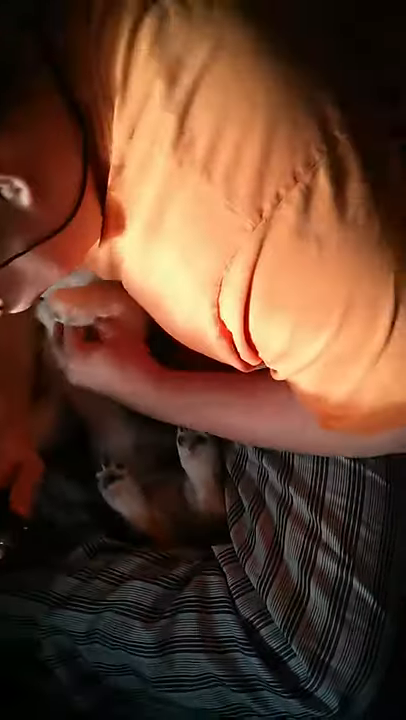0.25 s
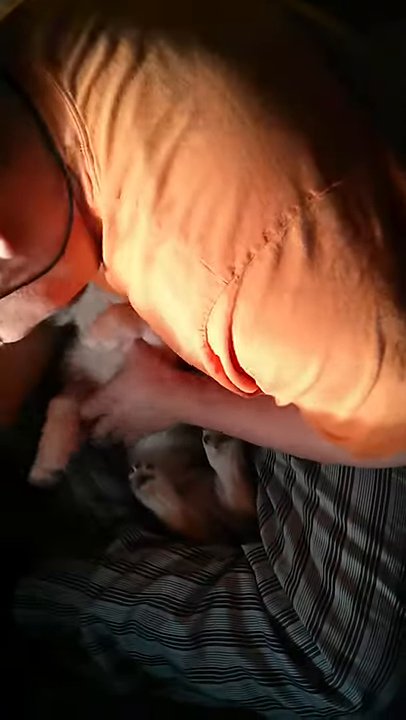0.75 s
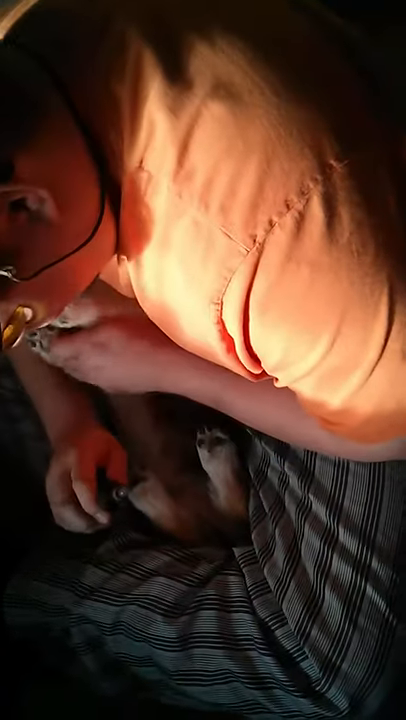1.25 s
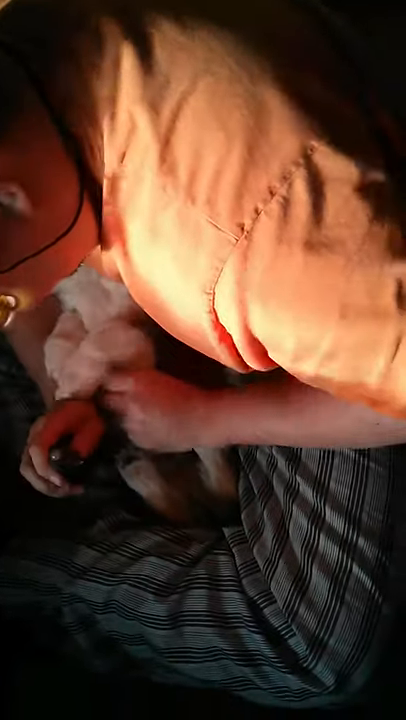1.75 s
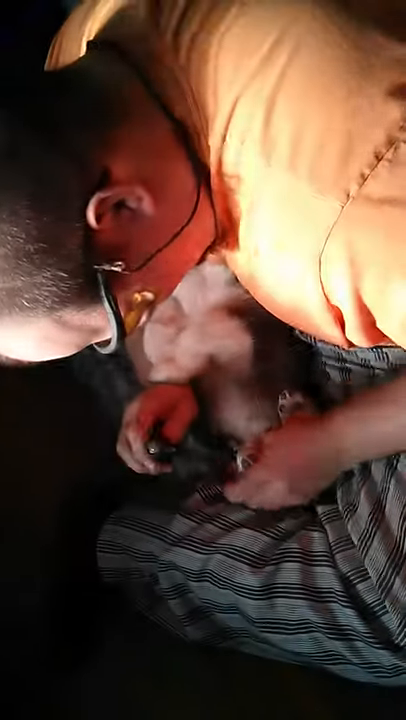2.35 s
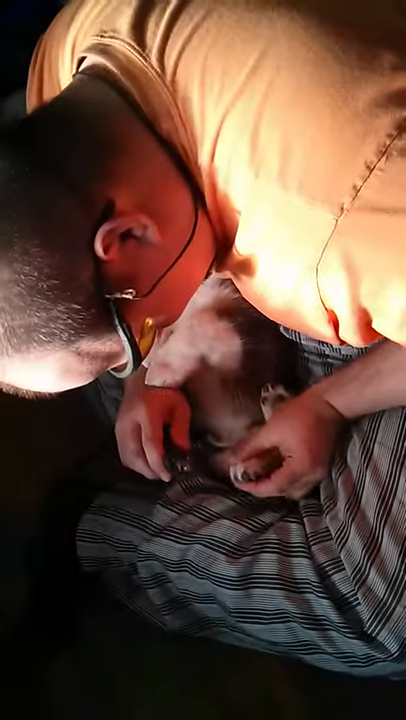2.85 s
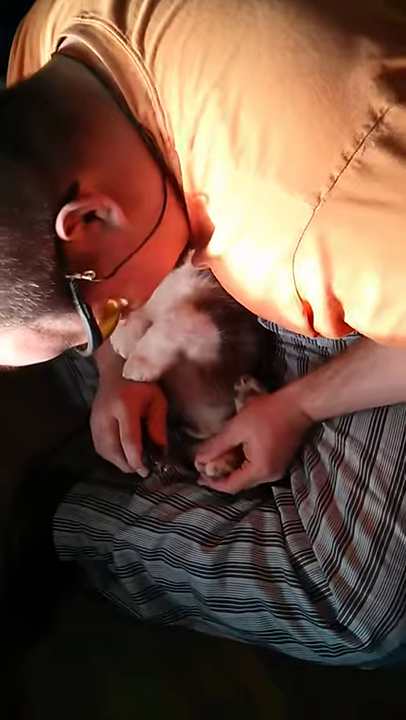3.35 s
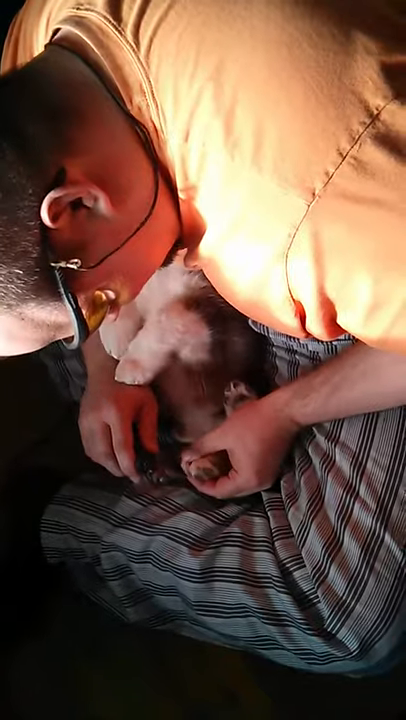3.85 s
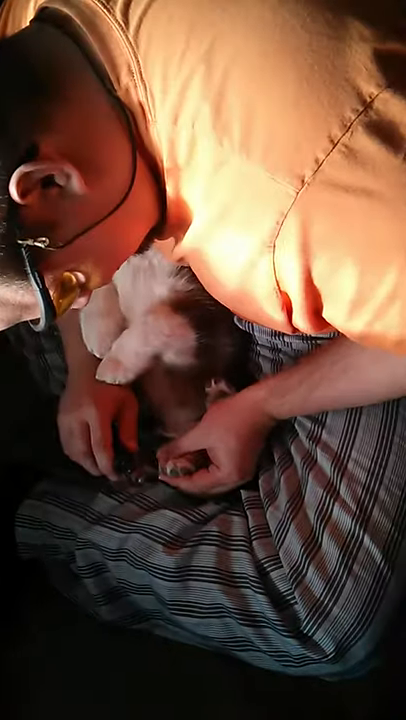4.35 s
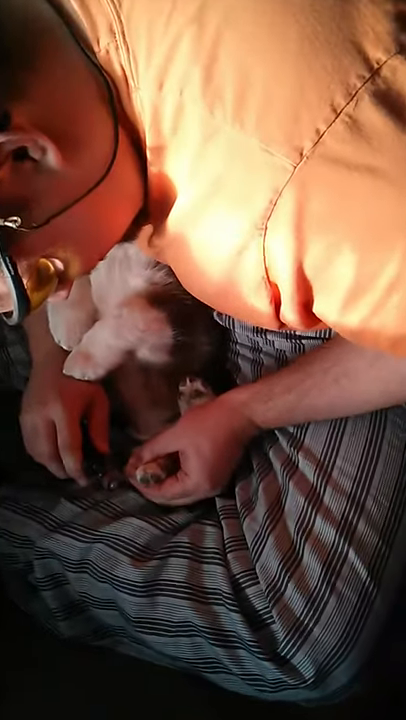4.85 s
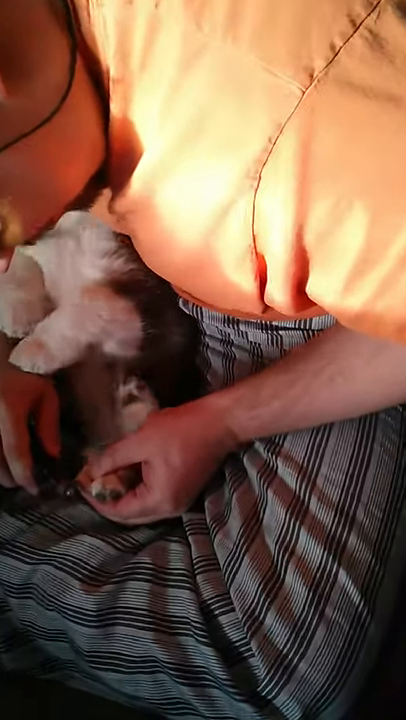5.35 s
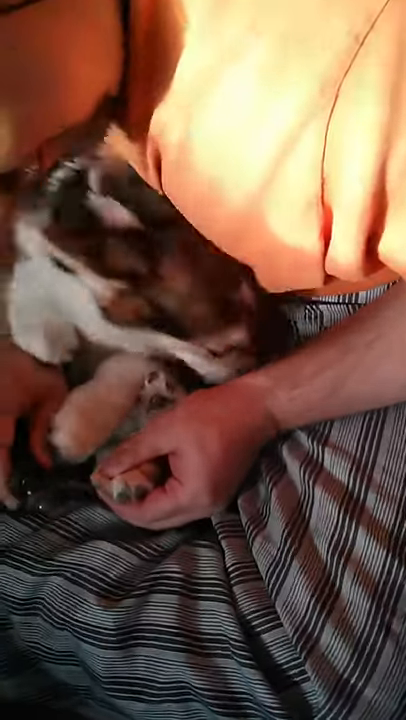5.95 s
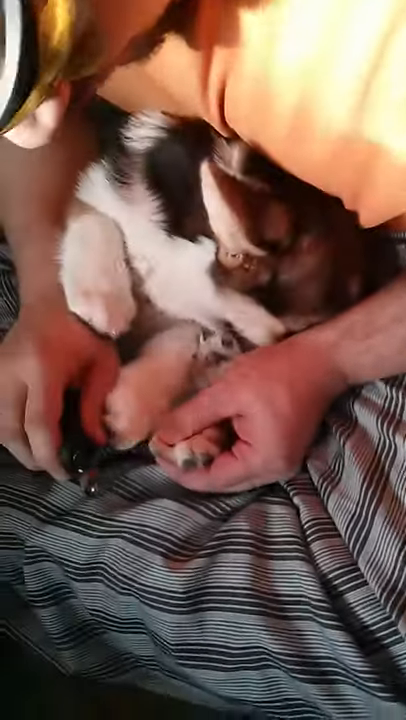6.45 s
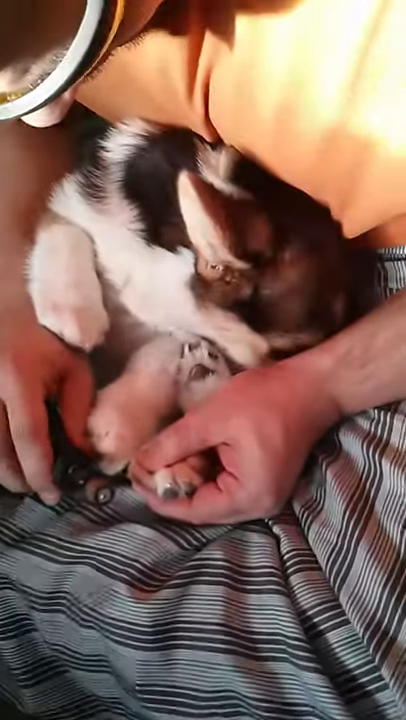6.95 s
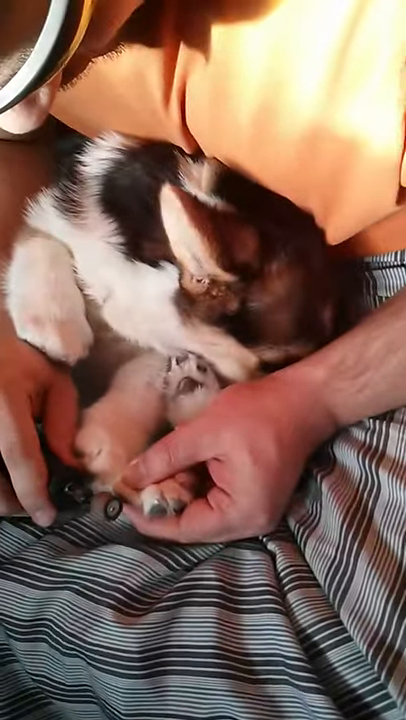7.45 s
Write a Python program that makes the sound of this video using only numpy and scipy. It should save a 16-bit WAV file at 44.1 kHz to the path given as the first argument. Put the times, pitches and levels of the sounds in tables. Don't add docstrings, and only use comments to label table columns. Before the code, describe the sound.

Close, mono phone sound of a tiny high-speed motor already running and never stopping. Its fan sings a needle-thin, very high tone amid sharp hiss; lower hums swell and fade underneath. The tone darts in and out at first, steadies, dips briefly around five seconds, then returns stronger with more rattle, hum and dull air buffeting, cut off while still running.

```python
import sys
import numpy as np
from scipy import signal
from scipy.io import wavfile
from scipy.ndimage import uniform_filter1d

SR = 44100
rng = np.random.default_rng(int(sys.argv[2]) if len(sys.argv) > 2 else 0)


def ratio_of_db(decibels):
    return 10 ** (np.asarray(decibels, float) / 20)


def wav_out(sig):
    wavfile.write(sys.argv[1], SR, np.round(np.clip(np.atleast_2d(sig).T, -1, 1) * 32767).astype(np.int16))


N = 339997

BLADES = 18
FRAME = dict(nperseg=2048, noverlap=1536)


def curves(table):
    s, *columns = np.transpose(table)
    return np.array([np.interp(np.arange(N) / SR, s, c) for c in columns])


def walk(rate):
    steps = np.repeat(rng.standard_normal(N // 200), 4)
    slewed = uniform_filter1d(uniform_filter1d(steps, 4), 4)
    return 1.3 * np.interp(np.arange(N) * rate * 4 / SR, np.arange(len(steps)), slewed)


def swell(start_s, peak_s, end_s):
    t = np.arange(0, N, 64) / SR
    angle = np.interp(t, (start_s, peak_s, end_s), (0, np.pi / 2, 0))
    return np.sin(angle) ** 1.74


def full(x):
    return np.interp(np.arange(N) / 64, np.arange(len(x)), x)


def swells(rows, rest_db):
    rises = sum(ratio_of_db(db) * swell(a, b, c) for a, b, c, db in rows)
    return full(20 * np.log10(ratio_of_db(rest_db) + rises))


def band(centre_hz, width_hz):
    b, a = signal.iirpeak(centre_hz, centre_hz / width_hz, fs=SR)
    once = signal.lfilter(b, a, rng.standard_normal(N))
    twice = signal.lfilter(b, a, once)
    return twice / twice.std()


def tone(order, turn, db, flutter_db):
    level = np.sqrt(2) * ratio_of_db(db + flutter_db * walk(30))
    return level * np.sin(order * turn + 2 * np.pi * rng.random())


def nearness():
    # time in seconds, gain in dB.
    near_rows = [
        (0.0, -5),
        (.5, -7.5),
        (1.3, 2),
        (2.6, -4),
        (3.0, -0.5),
        (5.3, 6),
        (5.7, -4.5),
        (6.2, 6),
        (7.71, 7),
    ]
    return curves(near_rows)[0]


def vent_aim(near_db):
    # time in seconds, air rush in dB, brightness in dB.
    facing = [(0.0, 0, 1.5), (.2, -1, 1), (.45, 3.5, -6), (.75, 4.5, -11), (.95, 1.5, -14), (1.2, 1, 1.5),
              (1.5, -1.5, 2.5), (1.85, -2, -0.5), (2.07, 2.5, -3.5), (2.3, -2, 4), (2.9, 0, 6.5),
              (3.9, 1, 3), (5.0, 2, -3), (5.3, 1.5, -6.5), (5.75, 3, -8), (6.3, 3.5, -1.5), (6.75, 2, 4),
              (7.71, 1.5, 0)]
    # start, peak and end in seconds, level in dB.
    case_free = [
        (-.3, .1, 0.61, 4.5),
        (.8, 1.3, 1.67, 0.5),
        (2.2, 2.37, 2.86, 2),
        (5.4, 6.0, 6.54, 0.5),
        (6.2, 6.8, 8.5, 5.5),
    ]
    # start, peak and end in seconds, depth in dB.
    fingers = [
        (1.64, 1.734, 1.74, 5),
        (2.384, 2.494, 2.7, 7),
        (5.104, 5.28, 5.45, 5),
        (6.78, 6.86, 7.8, 1.5),
    ]
    # start, peak and end in seconds, depth in dB.
    palm = (1.7, 3.7, 5.1, 3)
    air_db, bright_db = curves(facing)
    cover_db = full(sum(db * swell(a, b, c) for a, b, c, db in fingers))
    palm_db = palm[3] * full(swell(*palm[:3]))
    low = 0.52 * near_db
    case = swells(case_free, rest_db=1.5)
    vents = air_db - cover_db
    upper_vents = air_db + 0.73 * bright_db - cover_db
    hiss = air_db + 1.1 * bright_db - 0.19 * cover_db - palm_db
    aim_db = np.array([low, case, vents, upper_vents, hiss])
    return aim_db - aim_db.mean(axis=1, keepdims=True)


def blade_level():
    # time in seconds, level in dB.
    steady = [(2.63, -45), (2.69, -13.5), (4.95, -12.5), (5.12, -23.5), (5.32, -24.5), (5.6, -17.5),
              (5.8, -16), (6.1, -8.5), (6.43, -10.5), (6.53, -22), (6.62, -12), (7.71, -9)]
    # start, peak and end in seconds, level in dB.
    passes = [(-.05, .05, 0.13, -17.5), (.1, .17, 0.27, -19.5), (.27, .385, 0.45, -7), (.5, .56, 0.56, -14),
              (.6, .72, 0.82, -16), (.8, .86, 0.97, -25), (.96, .99, 1.04, -17), (1.03, 1.12, 1.19, -12),
              (1.15, 1.29, 1.61, -8), (1.57, 1.62, 1.72, -19.5), (1.72, 1.79, 1.9, -19.5),
              (1.87, 1.9, 1.95, -18), (1.95, 2.01, 2.2, -14), (2.1, 2.3, 3.8, -25), (2.5, 2.56, 2.62, -25),
              (2.7, 2.81, 2.9, -22), (3.0, 3.28, 3.45, -21), (3.55, 3.9, 4.08, -15), (4.1, 4.27, 4.3, -24),
              (4.55, 4.75, 4.9, -14), (5.48, 5.55, 5.65, -17), (6.72, 6.86, 6.9, -17)]
    return 20 * np.log10(ratio_of_db(swells(passes, -53)) + ratio_of_db(curves(steady)[0]))


def draught(blade_db, near_db):
    b, a = signal.butter(1, (45, 1020), "band", fs=SR)
    x = signal.lfilter(b, a, rng.standard_normal(N))
    blast = ratio_of_db(-61) + ratio_of_db(blade_db - 41)
    reach_db = 2.43 * np.maximum(near_db - 3.5, 0)
    return x / x.std() * blast * ratio_of_db(reach_db + 3 + 1.4 * walk(23))


def drum():
    # start, peak and end in seconds, level in dB.
    buzzes = [(-.2, .04, 0.74, -35.5), (1.3, 1.75, 1.85, -41), (2.55, 2.9, 3.9, -35),
              (3.2, 3.65, 3.8, -37.5), (4.1, 4.5, 4.9, -36), (4.7, 5.0, 5.3, -39), (5.35, 5.55, 6.12, -38),
              (6.1, 6.72, 7.1, -32.5), (6.75, 6.98, 7.15, -31), (7.1, 7.35, 7.5, -33),
              (7.4, 7.58, 7.7, -39)]
    level_db = swells(buzzes, rest_db=-54) - 3.5 + 2.1 * walk(35)
    return band(centre_hz=2314, width_hz=173) * ratio_of_db(level_db)


def rush(turn, aim_db):
    # pitch in Hz, level in dB per Hz.
    colour = np.array([(300, -66), (650, -24.5), (900, -20.5), (1200, -24.5), (1700, -16.5), (2300, -18),
                       (2900, -19), (4200, -23), (5600, -19), (7000, -2.5), (8300, 2.5), (10200, -7.5),
                       (12300, -19), (15300, -18)])
    region_hz = (800, 2740, 6500, 10070, 13468)
    strip_hz, patch_s, patchy_db = 350, 0.16, 1.75
    hz, s, z = signal.stft(rng.standard_normal(N), SR, **FRAME)
    colour_db = np.interp(np.log(hz + 1), np.log(colour[:, 0]), colour[:, 1])
    share = np.array([np.interp(hz, region_hz, row) for row in np.eye(len(region_hz))])
    patches = rng.standard_normal(z.shape)
    for _ in range(2):
        patches = uniform_filter1d(patches, int(strip_hz / hz[1]), axis=0)
        patches = uniform_filter1d(patches, int(patch_s / s[1]), axis=1)
    patches = patches - uniform_filter1d(patches, int(2500 / hz[1]), axis=0)
    aim = share.T @ aim_db[:, np.minimum((s * SR).astype(int), N - 1)]
    gain = ratio_of_db(colour_db[:, None] + aim + patchy_db * patches / patches.std())
    air = signal.istft(z * gain, SR, **FRAME)[1][:N]
    air = air * ratio_of_db(-16.5) / np.sqrt(np.mean(ratio_of_db(colour_db) ** 2))
    return air * (1 + 0.3 * np.cos(turn))


def faint_orders(turn, vent_db):
    # multiple of shaft speed, level in dB.
    weak_orders = [(6, -57), (9, -54), (11, -77), (12, -54), (13, -48), (14, -40), (15, -34.5), (20, -46),
                   (21, -52), (27, -77), (32, -52)]
    out = np.zeros(N)
    for k, db in weak_orders:
        out = out + tone(round(k), turn, db + vent_db + 2 * walk(1.36), flutter_db=1.6)
    return out


def order_levels():
    # start, peak and end in seconds, level in dB.
    first = [
        (-.5, 0, .54, -28.5),
        (0.512, 0.787, 1.14, -40),
        (1.064, 1.587, 2.3, -34),
        (1.726, 2.1, 2.79, -37.5),
        (2.706, 3.147, 5, -52),
        (4.538, 5.64, 8.1, -26),
        (6.397, 7.35, 14, -26),
    ]
    second = [
        (-.3, .5, 1.8, -49),
        (1.0, 1.7, 2.6, -49),
        (6.198, 6.51, 7.3, -46),
    ]
    third = [(0, 0.175, 0.27, -43), (.55, 0.805, 0.98, -39.5), (0.752, 1.07, 1.55, -27.5),
             (1.5, 1.76, 2.22, -37.5), (1.99, 2.395, 5.2, -39.5), (2.58, 5.072, 5.77, -31),
             (4.205, 4.5, 5.7, -46), (5.596, 5.903, 6.1, -46), (5.996, 6.487, 6.8, -35.5),
             (6.6, 6.754, 6.85, -46), (6.84, 7.147, 10, -39)]
    fourth = [(-.2, 0, 0.12, -28), (0.318, .6, 1.12, -27), (1.036, 1.34, 1.8, -30),
              (1.74, 1.776, 1.916, -26.5), (1.747, 2.0, 2.41, -25), (1.993, 2.661, 2.885, -28.5),
              (2.695, 3.597, 7.4, -37.5), (3.99, 4.505, 4.6, -42), (4.8, 5.255, 5.7, -38),
              (5.4, 5.65, 5.9, -30.5), (6.2, 6.497, 7.2, -42), (7.0, 7.604, 8.6, -39)]
    fifth = [
        (-.05, 0.028, 0.14, -35.5),
        (2.3, 2.603, 3.7, -53),
        (5.299, 5.528, 6.4, -46),
        (5.987, 6.53, 6.93, -33),
        (6.4, 7.04, 8.13, -31),
    ]
    seventh = [
        (.1, .24, 0.42, -41),
        (1.0, 1.31, 1.9, -53),
        (5.7, 5.977, 6.2, -35.5),
        (6.095, 6.598, 10, -41),
    ]
    two_below = [(-.2, 0.215, 0.56, -23.5), (.33, 0.447, 0.64, -19.5), (.75, 1.0, 2.9, -26.5),
                 (1.805, 2.05, 1.7, -30), (2.48, 2.65, 2.1, -27), (3.6, 4.801, 6.2, -29),
                 (5.4, 5.703, 6.0, -29), (6.0, 6.45, 8.4, -22), (6.9, 7.404, 7.8, -23)]
    one_below = [(-.3, .3, 1.5, -29), (1.9, 2.05, 2.3, -25), (2.7, 4.85, 5.03, -23), (5.45, 5.58, 5.7, -24),
                 (6.03, 6.2, 6.55, -23), (6.5, 7.0, 7.2, -22), (7.2, 7.55, 8.4, -22)]
    one_above = [(0, .1, .4, -29), (2.6, 2.82, 3.0, -28), (4.2, 4.42, 4.7, -25), (4.9, 5.0, 5.4, -25),
                 (5.8, 5.95, 6.05, -28), (6.4, 6.65, 6.9, -28), (6.8, 7.47, 7.7, -21)]
    # order, its swells, resting level in dB. The last three lie beside the blade tone.
    shaded = [(1, first, -62), (2, second, -58), (3, third, -58), (4, fourth, -56), (5, fifth, -55),
              (7, seventh, -57), (16, two_below, -36), (17, one_below, -36), (19, one_above, -37)]
    levels = {}
    for k, rows, rest_db in shaded:
        wander_db = 1.3 * min(k - 1, 2) / 2
        levels[k] = swells(rows, rest_db) + wander_db * walk(9)
    return levels


def case_rattle(levels):
    # order, centre in Hz, width in Hz, level in dB against the order.
    rattles = [(1, 340, 260, -31), (4, 1944, 140, -10), (4, 1780, 600, -13), (5, 2440, 300, -6),
               (7, 3380, 78, -6.5)]
    out = np.zeros(N)
    for k, centre_hz, width_hz, db in rattles:
        out = out + band(centre_hz, width_hz) * ratio_of_db(levels[round(k)] + db + 3.2 * walk(40))
    return out


def shaft_orders(turn, levels):
    out = np.zeros(N)
    for k, db in levels.items():
        beside_db = -2.2 if k > 16 else 0
        flutter_db = min(.07 * k * k, 1.2 + .8 * (k > 10))
        out = out + tone(k, turn, db + beside_db, flutter_db)
    return out


def blade_tone(turn, blade_db):
    return tone(BLADES, turn, blade_db + 0.57 * walk(13), flutter_db=0.7)


def motor_turn():
    # time in seconds, blades passing in Hz.
    speed = [(0.0, 8729), (.75, 8720), (1.0, 8725), (1.4, 8717), (3.0, 8716), (4.0, 8726), (4.6, 8728),
             (5.5, 8744), (6.5, 8749), (7.71, 8769)]
    shaft_hz = curves(speed)[0] / BLADES * (1 + .0002 * walk(40))
    return 2 * np.pi * np.cumsum(shaft_hz) / SR


def scene():
    turn = motor_turn()
    blade_db = blade_level()
    near_db = nearness()
    aim_db = vent_aim(near_db)
    levels = order_levels()
    tool = draught(blade_db, near_db) + drum() + rush(turn, aim_db)
    tool = tool + faint_orders(turn, aim_db[2]) + case_rattle(levels)
    tool = tool + shaft_orders(turn, levels) + blade_tone(turn, blade_db)
    return np.array([tool, tool])


def microphone(x):
    bend = signal.lfilter(*signal.butter(1, 20, "high", fs=SR), x ** 2)
    x = x + ratio_of_db(-34) * bend
    ceiling, sharpness = .76, 4.5
    return x / (1 + abs(x / ceiling) ** sharpness) ** (1 / sharpness)


def thin(x):
    # centre in Hz, usual width in Hz, spread of width in Hz.
    slivers = [(625, 35, 60), (1200, 5, 50), (2120, -10, 50), (2520, 60, 40), (2830, 70, 40),
               (3170, 100, 60), (3530, 90, 65), (3840, 60, 90), (4180, 70, 80), (4520, 50, 70),
               (4850, 20, 90), (5150, -5, 60)]
    hz, s, z = signal.stft(x, SR, **FRAME)
    z = z * (hz < 15730)[:, None]
    power = abs(z) ** 2
    frames = np.minimum((s * SR).astype(int), N - 1)

    def power_near(centre_hz, reach_hz):
        return uniform_filter1d(np.mean(power[abs(hz - centre_hz) < reach_hz], axis=0), 9)

    for centre_hz, width_hz, spread_hz in slivers:
        low = centre_hz < 1500
        near = np.log(power_near(centre_hz, 65 if low else 170))
        if low:
            near = near - .8 * np.log(power_near(centre_hz, 290))
        weak = (near.mean() - near) / near.std()
        width = width_hz + spread_hz * (.5 * weak + walk(32)[frames])
        middle = centre_hz + .35 * spread_hz * walk(20)[frames]
        z = z * (abs(hz[:, None] - middle) > width / 2)
    return signal.istft(z, SR, **FRAME)[1][:N]


def low_pass(x):
    return signal.sosfilt(signal.butter(12, 16610, fs=SR, output="sos"), x)


def record(dry):
    x = thin(microphone(dry[0]))
    return low_pass(np.array([x, x]))


dry = scene()
out = record(dry)
wav_out(out)
```